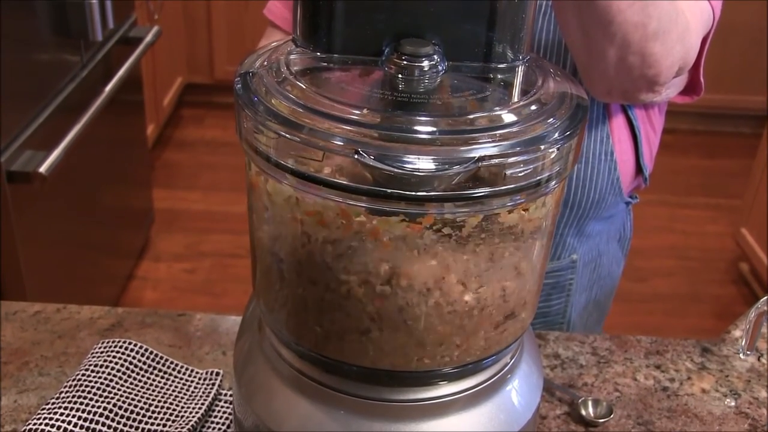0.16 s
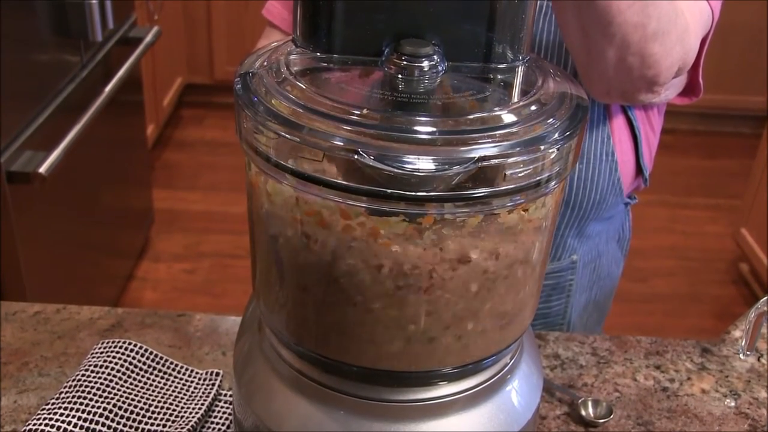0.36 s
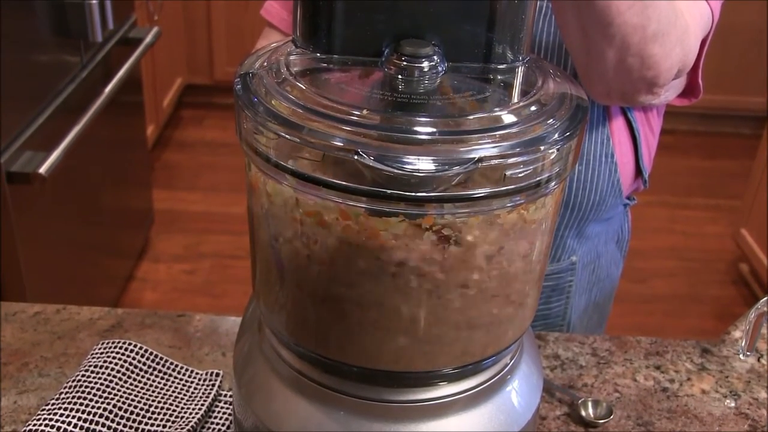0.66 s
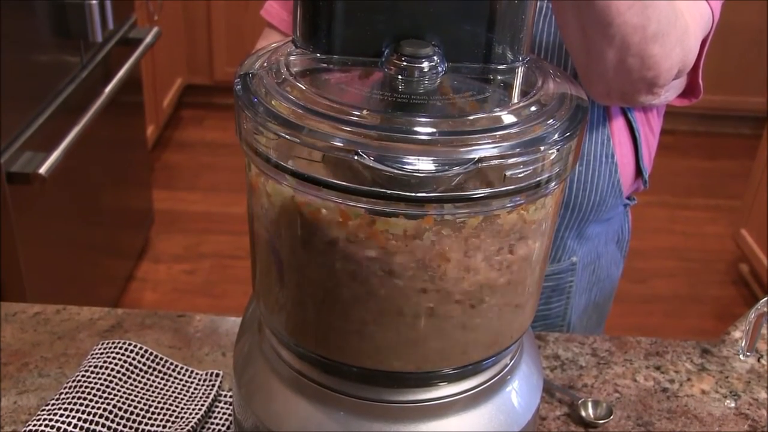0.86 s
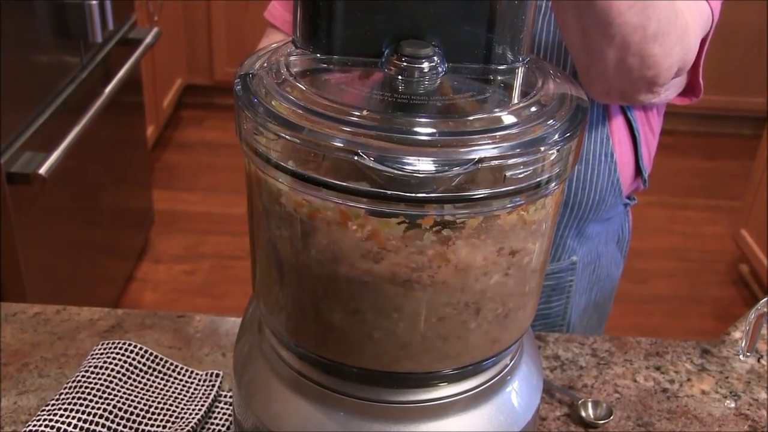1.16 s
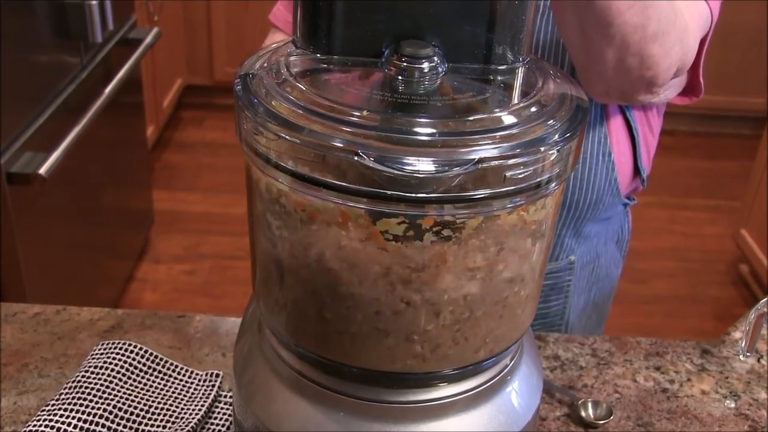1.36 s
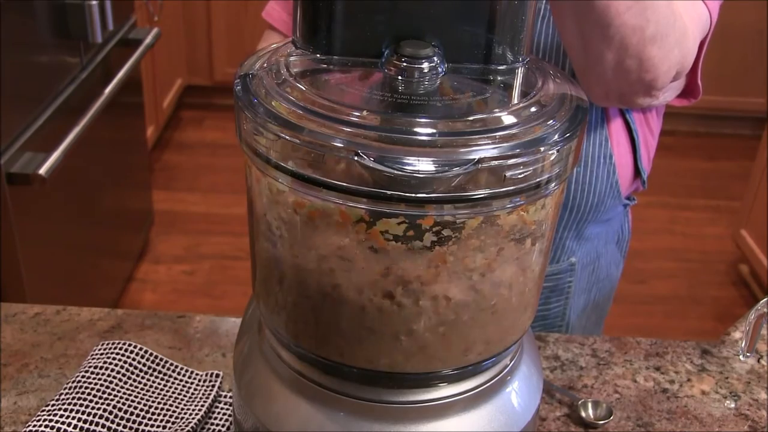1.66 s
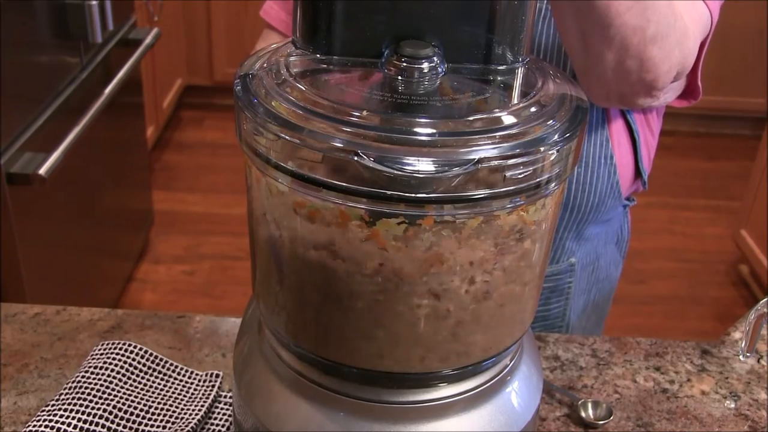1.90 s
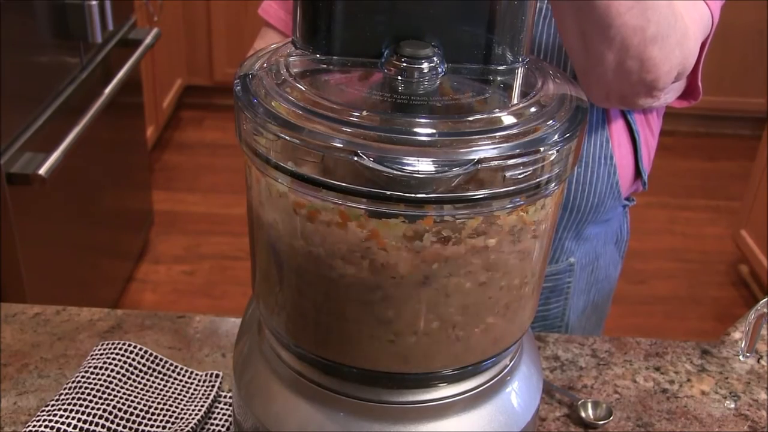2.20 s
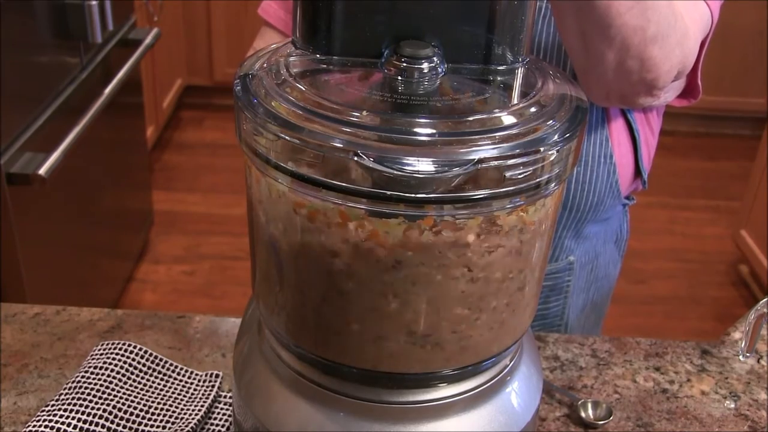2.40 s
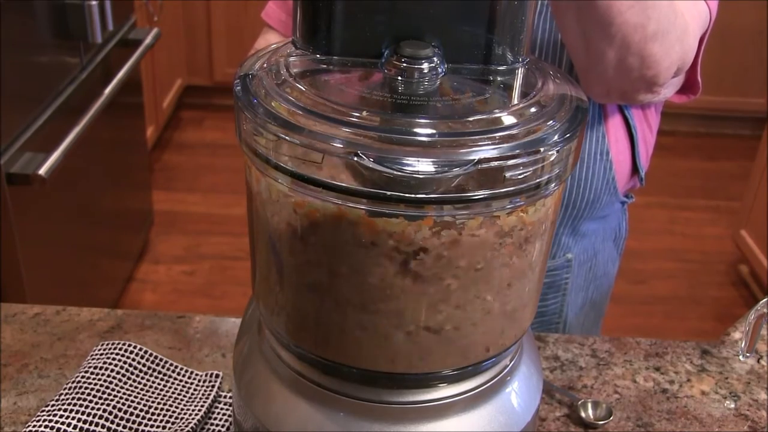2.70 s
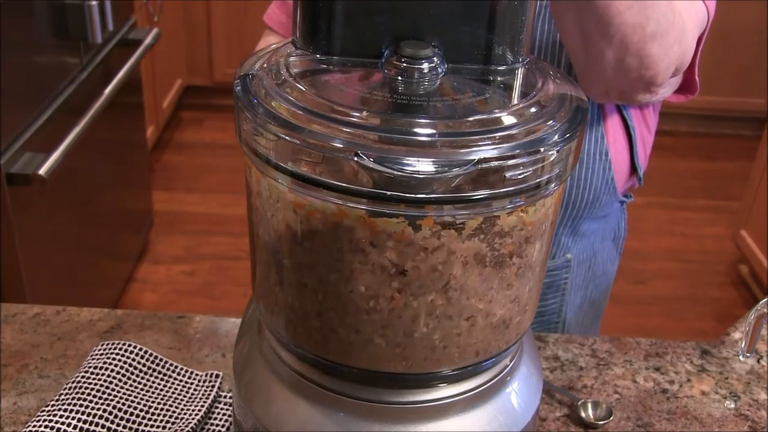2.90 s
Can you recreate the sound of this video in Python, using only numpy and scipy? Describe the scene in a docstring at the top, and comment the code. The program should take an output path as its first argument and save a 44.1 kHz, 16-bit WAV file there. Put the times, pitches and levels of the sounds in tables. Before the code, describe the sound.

A food processor runs in two rough, rattling bursts, churning a chunky mixture on a stone counter

```python
"""In a kitchen, on a stone counter, a food processor is pulsed twice; an earlier pulse is still dying away.
The blade throws thick food at the plastic bowl: random slaps drive the ringing of the bowl, and filtered
noise makes the rumble of the base and the spatter of fine specks. Hard bits tick and lumps knock on the wall.
Each pulse starts with a button click, a short fizz from the switch, a groan and a thunk of dying tones,
then a low hum that fades. Echoes from near surfaces, the room and a soft kitchen background surround it."""
import sys
import numpy as np
from scipy import signal
from scipy.io import wavfile

SR = 44100
rng = np.random.default_rng(int(sys.argv[2]) if len(sys.argv) > 2 else 0)


def to_wav(s):
    """Save 16-bit WAV."""
    ch = np.atleast_2d(s).T  # columns
    pcm = np.round(np.clip(ch, -1, 1) * 32767)  # PCM
    wavfile.write(sys.argv[1], SR, pcm.astype(np.int16))


def convert_level_to_amplitude(level_db):
    """Map a level in decibels to its linear amplitude factor."""
    exponent = np.asarray(level_db, float) / 20
    return 10 ** exponent


N = 134505
LEAD = 26460  # samples made ahead of time 0 and cut off at the end
TOTAL = N + LEAD
TIME = (np.arange(TOTAL) - LEAD) / SR
EVENT = 6000  # samples in one short event
EVENT_TIME = np.arange(EVENT) / SR
BASE_TOP_HZ = 400  # resonances below this belong to the base, the others to the bowl
SPIN_UP_S = 0.01
SIDE_SHARE = 0.42  # part of the room and background that differs left and right

# Kitchen background. Each row: frequency in Hz, relative level in dB per Hz.
AIR_SPECTRUM = [(18, -78), (30, -54), (92, -17), (837, -3), (2430, -10), (3230, -11), (15000, -41)]
# How long the room rings. Each row: frequency in Hz, time to fall 60 dB in seconds.
ROOM_DECAY = [(150, 0.88), (1000, 0.8), (4000, 0.88), (12000, 0.4)]
# Tone of the room echo. Each row: frequency in Hz, gain in dB.
ROOM_COLOUR = [(100, -1), (600, -0.5), (1500, -0.5), (4000, -4), (9000, 2), (14000, -10)]
# Tone of the echo from near surfaces. Each row: frequency in Hz, gain in dB.
COUNTER_COLOUR = [(100, -15), (800, -9), (2000, -1.5), (5000, 0), (10000, 0), (12500, -5), (14500, -9)]
# Button clicks. Each row: start in seconds, peak level in dB.
BUTTON_CLICKS = [(0.091, -21.5), (1.577, -20)]
# Tones of the button. Each row: middle frequency in Hz, relative level in dB, time to fall 60 dB in seconds.
BUTTON_MODES = [(734, -7, 0.028), (1020, -3, 0.026), (1300, -7, 0.064), (1550, -11, .025),
                (2100, -3.5, 0.04), (2180, -17.5, 0.39), (2320, -20, 0.31)]
# Switch contacts. Each row: start in seconds, peak level in dB before the trims in switch_contact().
SWITCH_FIZZES = [(0.146, -29.5), (1.6302, -26.5)]
# Sound of the fizz. Each row: frequency in Hz, relative level in dB per Hz.
FIZZ_SPECTRUM = [(2060, -18), (3500, -21), (4560, -22), (5240, -25), (5800, -16), (6740, -18), (7550, -22),
                 (11600, -19), (15800, -32)]
# Switch spring. Each row: middle frequency in Hz, relative level in dB, time to fall 60 dB in seconds.
SPRING_MODES = [(5250, 5, 0.02), (7000, -12, .03), (11900, -7, .04), (13100, -9, .03)]
# The drive takes up. Each row: start in seconds, peak level in dB, extra weight of the low base tone in dB.
DRIVE_THUNKS = [(.209, -12, 12.5), (0.2172, -16, 5), (1.690, -5.5, -1.5)]
# Tones of the base. Each row: middle frequency in Hz, relative level in dB, time to fall 60 dB in seconds.
BASE_MODES = [(360, -13, 0.065), (717, 2, 0.031), (770, -6, 0.081), (1280, -11, 0.034), (1750, -6, 0.021),
              (1920, -10.5, 0.031), (2820, -8, 0.027), (3035, -13, 0.043), (4330, -6, 0.017)]
# Hard bits on the wall. Each row: start in seconds, peak level in dB before a trim, centre frequency in Hz.
WALL_TICKS = [(0.238, -12, 2700), (0.268, -11, 7750), (0.275, -12, 5040), (0.3356, -16, 5770),
              (0.374, -10.5, 7450), (0.4105, -7, 1880), (0.4443, -8, 4350), (0.5267, -12, 5720),
              (0.553, -20, 5480), (0.655, -12, 5570), (0.7147, -16, 5800), (0.824, -21, 5460),
              (0.8599, -22, 6000), (0.9293, -13, 7000), (0.9951, -15, 5640), (1.0386, -13.5, 5760),
              (1.054, -15, 11900), (1.0593, -16, 5400), (1.061, -10, 2000), (1.074, -16, 7780),
              (1.1455, -9.5, 6460), (1.1817, -27, 6110), (1.217, -5.5, 7400), (1.31, -12, 5460),
              (1.414, -18, 6000), (1.736, -15, 6030), (1.761, -8, 5610), (1.932, -17, 5310),
              (2.0013, -10, 5500), (2.168, -16, 5340), (2.1782, -8.5, 3320), (2.3188, -16, 6300),
              (2.354, -11, 5000), (2.3902, -13, 8040), (2.3911, -6, 3400), (2.459, -11, 2100),
              (2.492, -11, 4800), (2.5196, -3.5, 2970), (2.5486, -8.5, 7600), (2.601, -13, 8100),
              (2.6372, -9, 7530), (2.7284, -9, 3400), (2.771, -13, 5080)]
# Lumps knocking the bowl. Each row: start in seconds, peak level in dB before a trim.
BOWL_KNOCKS = [(0.26, -11), (0.398, -13), (1.103, -21), (1.725, -11), (1.809, -21), (1.936, -10),
               (1.99, -5), (2.038, -5), (2.123, -5), (2.176, -5.5), (2.229, -1), (2.327, -8.5),
               (2.459, -4.5), (2.501, -0.5), (2.688, -7), (2.752, -6)]
# Resonances of bowl and base. Each row: middle frequency in Hz, width in Hz, relative level in dB.
BOWL_MODES = [(118.8, 8.9, -13.5), (146, 45, -13), (200.3, 19.5, -7.5), (247.2, 17.4, 1), (298, 31, -8.5),
              (455.6, 31, -10.5), (585.2, 23, -5), (757, 24, -2), (1135, 61, -1), (1250, 65, -1),
              (1293, 59, -1), (1361, 66, -9.5), (1738, 72, -12.5), (1928, 82, -11), (2868, 67, -18)]
# Broad sound of slapping food. Each row: frequency in Hz, relative level in dB per Hz.
SLAP_SPECTRUM = [(60, -45.5), (105, -17), (130, -13), (250, -6.5), (400, -8.5), (700, -5.5), (950, -8),
                 (1500, -3.5), (2200, -7), (3300, -9), (4500, -17.5), (6500, -41.5)]
# Treble sound of the fine specks. Each row: frequency in Hz, relative level in dB per Hz.
SPATTER_SPECTRUM = [(1470, -29.5), (2500, -13), (2920, 1), (3790, -6), (4560, -3), (5010, -5), (8390, -8),
                    (14300, -16.5), (15800, -47)]
# The counter shakes. Each row: frequency in Hz, relative level in dB per Hz.
COUNTER_SHAKE = [(15, -6), (40, -9), (90, 7), (130, -30), (300, -90)]
# Level curves, one list per pulse. Each row: time in seconds, then levels in dB of the bowl ring,
# the treble spatter, the base rumble and the slapping food (ring and rumble are trimmed in churning()).
PULSES = [
    [(0.215, -42, -37, -40, -19.5), (0.225, -27.5, -41, -42, -30), (0.271, -15.5, -28, -31, -26.5),
     (0.311, -22, -31, -34, -24), (0.375, -19.5, -28.5, -23.5, -23.5), (0.425, -18, -34, -25, -28.5),
     (0.489, -27, -31.5, -32.5, -26.5), (1.015, -21.5, -31, -29, -23.5), (1.079, -27.5, -27, -33, -26.5),
     (1.101, -22, -31.5, -29.5, -27), (1.141, -20.5, -31.5, -42, -26.5), (1.155, -25.5, -31, -32.5, -25),
     (1.333, -21, -30, -28.5, -23), (1.437, -28.5, -40.5, -33.5, -30.5), (1.5, -40, -52, -46, -45)],
    [(1.7, -30, -34, -26, -25), (1.712, -20.5, -44, -23.5, -33), (1.77, -24.5, -27, -33, -20),
     (1.84, -16, -32.5, -31, -25.5), (1.856, -23.5, -32, -23, -26.5), (2.026, -20.5, -31.5, -35, -22.5),
     (2.058, -25.5, -33, -21.5, -24), (2.116, -23, -35.5, -36.5, -26.5), (2.224, -24.5, -30.5, -32, -24),
     (2.24, -23, -28.5, -31, -32), (2.266, -21, -33, -30.5, -27.5), (2.558, -24, -27.5, -32, -21.5),
     (2.58, -20, -29, -25.5, -25), (2.756, -21, -27.5, -35.5, -21), (2.85, -42, -45.5, -41, -44)],
]
# End of the earlier pulse. Each row: time in seconds, then the same four levels in dB.
EARLIER_PULSE = [(-0.22, -18.5, -25.5, -29.5, -19.5)]


def evened(x):
    """Scales a sound to an average (rms) size of 1."""
    return x / np.sqrt(np.mean(x ** 2) + 1e-20)


def peak(x, db):
    """Scales a sound to a peak level in dB."""
    return convert_level_to_amplitude(db) * x / np.abs(x).max()


def noise():
    """White noise for the whole scene."""
    return rng.standard_normal(TOTAL)


def slow(rate_hz):
    """Smooth random movement of rms 1: noise with everything well above rate_hz removed."""
    return evened(signal.sosfilt(signal.butter(2, rate_hz, fs=SR, output="sos"), noise()))


def read(points, hz):
    """Reads a frequency table between its rows, on a log-frequency axis."""
    f, value = np.transpose(points)
    return np.interp(np.log(hz + 1), np.log(f + 1), value)


def colour(x, points):
    """Gives a sound the tabled spectrum, with a filter that never rings ahead of its input."""
    hz = np.abs(np.fft.fftfreq(4096, 1 / SR))
    log_gain = np.log(convert_level_to_amplitude(np.maximum(read(points, hz), -100)))
    phase = -np.imag(signal.hilbert(log_gain))
    taps = np.fft.ifft(np.exp(log_gain + 1j * phase)).real[:2048]
    return signal.oaconvolve(x, taps)[:len(x)]


def resonate(x, hz, width):
    """One resonance of gain 1 at its centre, which may be fixed or follow a curve."""
    spin = np.exp(2j * np.pi * np.cumsum(hz * np.ones(len(x))) / SR)
    r = np.exp(-np.pi * width / SR)
    # shift the centre down to 0 Hz, smooth there, shift back
    return 2 * (spin * signal.lfilter([1 - r], [1, -r], x / spin)).real


def add(mix, s, sound):
    """Mixes a sound in at time s in seconds."""
    part = mix[round(s * SR) + LEAD:][:len(sound)]
    part += sound[:len(part)]


def burst(t60, rise_s=0.00023):
    """A puff of noise that rises quickly and falls 60 dB in t60 seconds."""
    return np.minimum(EVENT_TIME / rise_s, 1) * convert_level_to_amplitude(-60 * EVENT_TIME / t60) * rng.standard_normal(EVENT)


def strike(modes, crack):
    """One blow: slightly detuned dying tones over a short crack of noise."""
    ring = np.zeros(EVENT)
    for hz, db, t60 in modes:
        detune, phase = rng.uniform(-1.2, 1, 2)
        tone = np.sin(2 * np.pi * (hz * (1 + 0.016 * detune) * EVENT_TIME + phase))
        ring += convert_level_to_amplitude(db - 60 * EVENT_TIME / t60) * tone
    rise = np.minimum(EVENT_TIME / 0.0019, 1)
    return rise * peak(ring, 0) + crack * peak(colour(burst(0.046), SLAP_SPECTRUM), 0)


def kitchen_air():
    """Steady coloured noise of the kitchen, partly different left and right."""
    mid, side = (evened(colour(noise(), AIR_SPECTRUM)) for _ in range(2))
    return convert_level_to_amplitude(-46.5) * np.array([mid + SIDE_SHARE * side, mid - SIDE_SHARE * side])


def kitchen_echo(x):
    """Sparse random-sign echoes: the room's bands die at their own speeds, near surfaces answer briefly."""
    room_db, counter_db, counter_t60 = -9.5, -9, 0.11
    taps = np.zeros((3, SR))
    at = np.arange(40, SR - 20, 20) + rng.integers(0, 20, (3, 2202))
    np.put_along_axis(taps, at, rng.choice([-1., 1.], at.shape), 1)

    hz, t, z = signal.stft(taps[:2], SR, nperseg=256)
    decay = convert_level_to_amplitude(-60 * t / read(ROOM_DECAY, hz)[:, None])
    mid, side = signal.istft(z * decay, SR, nperseg=256)[1]
    tail = np.array([mid + SIDE_SHARE * side, mid - SIDE_SHARE * side]) / np.linalg.norm(mid)
    far = signal.fftconvolve(colour(x, ROOM_COLOUR)[None], tail, axes=1)[:, :TOTAL]

    near_taps = taps[2, :EVENT] * convert_level_to_amplitude(-60 * EVENT_TIME / counter_t60)
    near_taps = near_taps / np.linalg.norm(near_taps)
    near = signal.oaconvolve(colour(x, COUNTER_COLOUR), near_taps)[:TOTAL]
    # the near echo has opposite signs left and right
    return convert_level_to_amplitude(room_db) * far + convert_level_to_amplitude(counter_db) * np.array([near, -near])


def button_clicks():
    """The button's plastic tones die away over a short crack."""
    out = np.zeros(TOTAL)
    for s, db in BUTTON_CLICKS:
        add(out, s, peak(strike(BUTTON_MODES, crack=0.35), db))
    return out


def switch_contact():
    """A decaying fizz of noise at the switch contact, with the tones of its spring."""
    fizz_trim_db, spring_trim_db = 0.5, -2.5
    out = np.zeros(TOTAL)
    for s, db in SWITCH_FIZZES:
        fizz = colour(burst(t60=0.17, rise_s=0.0027), FIZZ_SPECTRUM)
        add(out, s, peak(fizz, db + fizz_trim_db))
        add(out, s, peak(strike(SPRING_MODES, crack=0), db + spring_trim_db))
    return out


def motor_groan():
    """The motor groans just before it turns: noise through one low resonance, with a broad part."""
    strain_s, rise_s, level_db = 0.033, 0.014, -35
    out = np.zeros(TOTAL)
    for rows in PULSES:
        low, broad = rng.standard_normal((2, EVENT))
        low = evened(resonate(low, hz=254, width=120))
        groan = evened(low + 0.49 * evened(colour(broad, SLAP_SPECTRUM)))
        shape = np.minimum(EVENT_TIME / rise_s, 1) * (EVENT_TIME < 1.3 * strain_s)
        add(out, rows[0][0] - strain_s - SPIN_UP_S, convert_level_to_amplitude(level_db) * groan * shape)
    return out


def drive_thunks():
    """The drive takes up with a blow that sets off the base's dying tones."""
    out = np.zeros(TOTAL)
    for s, db, low_db in DRIVE_THUNKS:
        modes = [(hz, level + low_db * (hz < BASE_TOP_HZ), t60) for hz, level, t60 in BASE_MODES]
        add(out, s, peak(strike(modes, crack=0.18), db))
    return out


def start_hum():
    """The motor's steady low tone, which fades after each start."""
    hum_hz, hum_db, hum_t60 = 243.1, -18.5, 0.51
    out = np.zeros(TOTAL)
    for rows in PULSES:
        t = TIME - rows[0][0] + SPIN_UP_S
        rise = np.clip(t / SPIN_UP_S, 0, 1)
        fade = convert_level_to_amplitude(hum_db - 60 * np.maximum(t, 0) / hum_t60)
        out += rise * fade * np.sin(2 * np.pi * hum_hz * t)
    return out


def bowl(x, low=None):
    """Resonances of the bowl (low=False), the base (low=True) or both; those of the bowl are shifted."""
    shift_share, shift_rate_hz = 0.016, 8.3
    out = np.zeros(len(x))
    for k, (hz, width, db) in enumerate(BOWL_MODES):
        if low in (None, hz < BASE_TOP_HZ):
            # under steady slaps the food load moves each resonance; otherwise one random shift
            drift = slow(shift_rate_hz) if low is False else rng.standard_normal()
            centre = hz * (1 + shift_share * drift * (hz > BASE_TOP_HZ))
            out += (-1) ** k * convert_level_to_amplitude(db) * resonate(x, centre, width)
    return out


TICK_T60 = 0.011  # seconds for a tick's puff of noise to fall 60 dB


def wall_ticks():
    """Hard bits snap against the wall: a short puff rings one spot over a broad snap."""
    trim_db, sharpness, snap_hz, snap_share = -2.5, 3.8, 3450, 0.48
    out = np.zeros(TOTAL)
    for s, db, hz in WALL_TICKS:
        puff = burst(TICK_T60)
        ring = resonate(resonate(puff, hz, hz / sharpness), hz, hz)
        snap = resonate(puff, snap_hz, snap_hz)
        add(out, s, peak(evened(ring) + snap_share * evened(snap), db + trim_db))
    return out


def bowl_knocks():
    """Lumps knock the whole bowl: a softer puff rings all resonances, with a broad slap."""
    trim_db = -7
    out = np.zeros(TOTAL)
    for s, db in BOWL_KNOCKS:
        puff = burst(t60=0.029, rise_s=0.0013)
        add(out, s, peak(evened(bowl(puff)) + 0.72 * evened(colour(puff, SLAP_SPECTRUM)), db + trim_db))
    return out


def grit():
    """Small hard bits at random moments, each ringing one patch of the wall."""
    hits_per_s, spread_db, sharpness = 22, 2.5, 4.4  # rate for each patch
    out = np.zeros(TOTAL)
    decay = convert_level_to_amplitude(-60 * EVENT_TIME / TICK_T60)
    for hz in np.geomspace(2420, 11500, 8):
        size = convert_level_to_amplitude(spread_db * np.minimum(rng.exponential(1, TOTAL), 4))
        hits = size * (rng.random(TOTAL) < hits_per_s / SR)
        puffs = signal.oaconvolve(hits, decay)[:TOTAL] * noise()
        out += resonate(puffs, hz, hz / sharpness) / np.sqrt(hz)
    return evened(out)


def effort(column):
    """Level of all pulses for one column: quick start, the tabled curve, then coasting down."""
    coast_db_per_s = 129
    out = np.zeros(TOTAL)
    for k, rows in enumerate([EARLIER_PULSE] + PULSES):
        rows = np.array(rows)
        db = np.interp(TIME, rows[:, 0], rows[:, column])
        db = db - coast_db_per_s * np.maximum(TIME - rows[-1, 0], 0)
        # the earlier pulse is already running
        start = np.clip((TIME - rows[0, 0]) / SPIN_UP_S + 1, 0, 1) if k else 1
        out = np.maximum(out, convert_level_to_amplitude(db) * start)
    return out


def impacts(per_s, spread_db, lumpy_db, turn, lump):
    """Random impacts, mostly small, swelling with each turn, each blade pass and the lumps of food."""
    turn_depth_db, blade_depth_db = 0.79, 0.92
    size = convert_level_to_amplitude(spread_db * np.minimum(rng.exponential(1, TOTAL), 3.5)) * noise()
    hits = size * (rng.random(TOTAL) < per_s / SR)
    swell_db = turn_depth_db * np.cos(turn) + blade_depth_db * np.cos(2 * turn) + lumpy_db * lump
    return hits * convert_level_to_amplitude(swell_db)


def churning():
    """Food slaps the bowl, the base rumbles and hums, fine specks spatter in the treble."""
    shaft_hz, shaft_wander = 28, 0.064  # mean turns per second, rms share by which they wander
    ring_db, rumble_db, hum_hz, hum_db, shake_db, grit_db = -2, -1.5, 125, -16.5, -34, -10
    turn = 2 * np.pi * np.cumsum(shaft_hz * (1 + shaft_wander * slow(5.7))) / SR
    lump = slow(32)
    wall, mush = (impacts(7000, 2, 0.28, turn, lump) for _ in range(2))
    specks = impacts(15000, 1, 1.5, turn, slow(27))

    ring = convert_level_to_amplitude(ring_db) * evened(bowl(wall, low=False))
    slaps = evened(colour(mush, SLAP_SPECTRUM))
    spatter = evened(colour(specks, SPATTER_SPECTRUM)) + convert_level_to_amplitude(grit_db) * grit()
    base = convert_level_to_amplitude(rumble_db) * evened(bowl(noise(), low=True))
    base += convert_level_to_amplitude(hum_db) * np.sin(2 * np.pi * hum_hz * TIME)
    base += convert_level_to_amplitude(shake_db) * evened(colour(noise(), COUNTER_SHAKE))
    return ring * effort(1) + spatter * effort(2) + base * effort(3) + slaps * effort(4)


def scene():
    """The machine, very slightly louder on the left, with its echoes and the kitchen background."""
    machine = button_clicks() + switch_contact() + motor_groan() + drive_thunks() + start_hum()
    machine = machine + wall_ticks() + bowl_knocks() + churning()
    direct = machine * convert_level_to_amplitude(np.array([[0.15], [-0.15]]))
    return (direct + kitchen_echo(machine) + kitchen_air())[:, LEAD:]


def roll_off(x):
    """The treble ends steeply here."""
    return signal.sosfilt(signal.butter(12, 15950, fs=SR, output="sos"), x)


def record(dry):
    """The microphone cuts the bass below about 93 Hz; a steep filter removes what lies above 15950 Hz."""
    thin = signal.sosfilt(signal.butter(1, 93, "high", fs=SR, output="sos"), dry)
    low_pass = signal.firwin(511, 15950, window=("kaiser", 9), fs=SR)
    mix = signal.oaconvolve(thin, low_pass[None], "same")
    return roll_off(mix)


dry = scene()
out = record(dry)
to_wav(out)
```